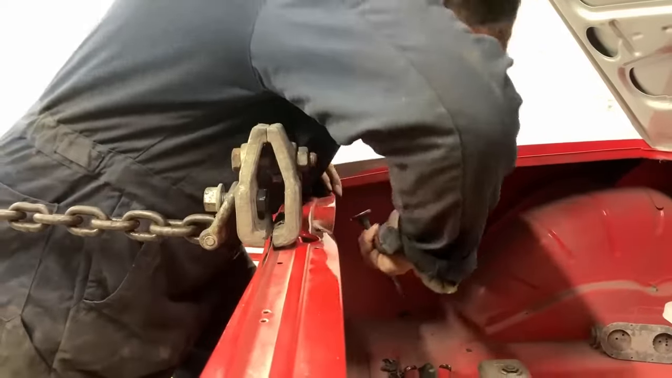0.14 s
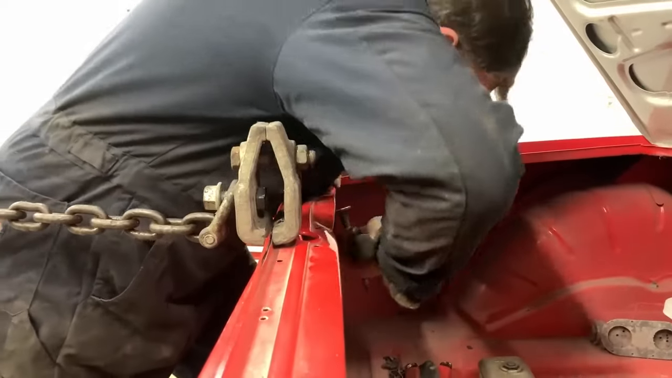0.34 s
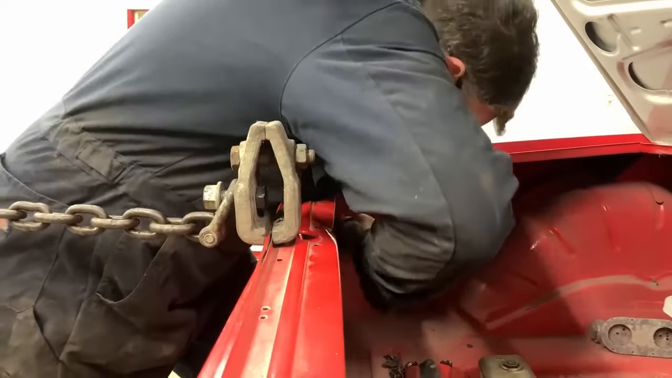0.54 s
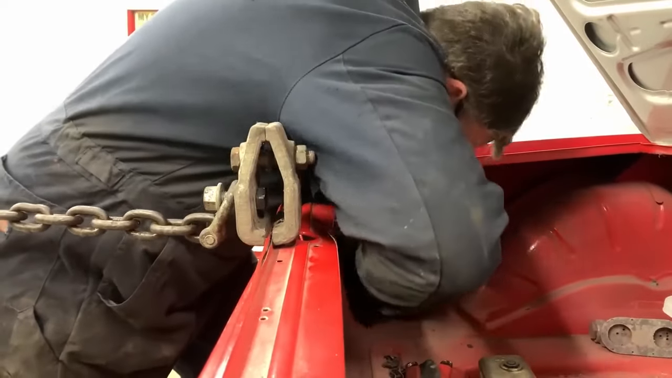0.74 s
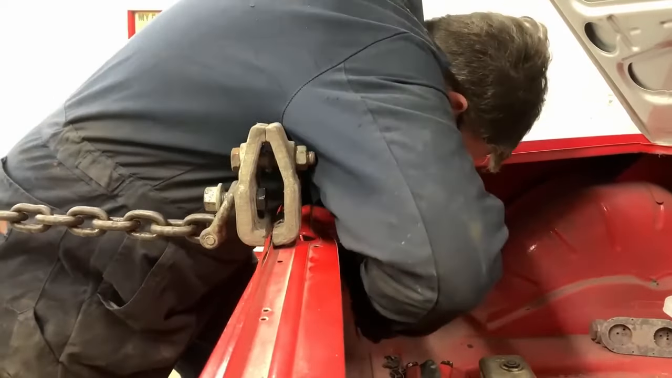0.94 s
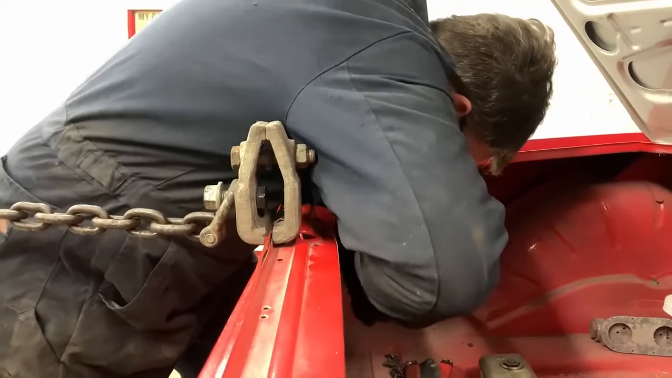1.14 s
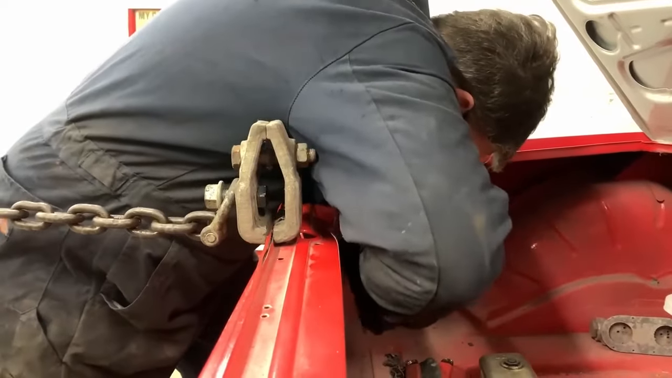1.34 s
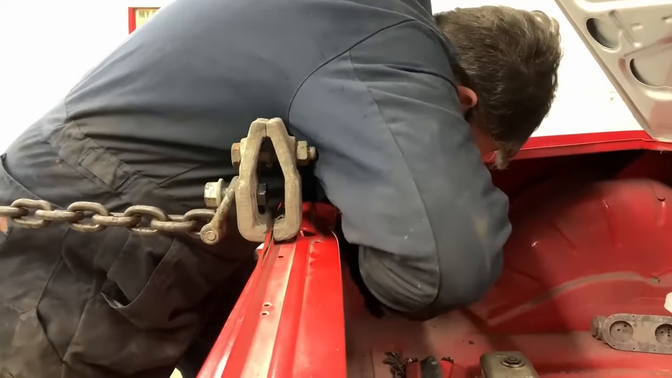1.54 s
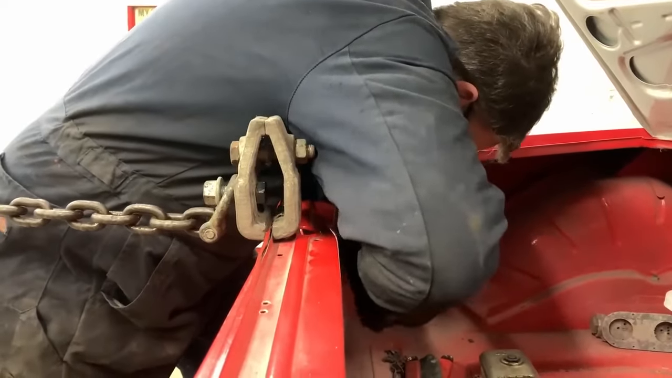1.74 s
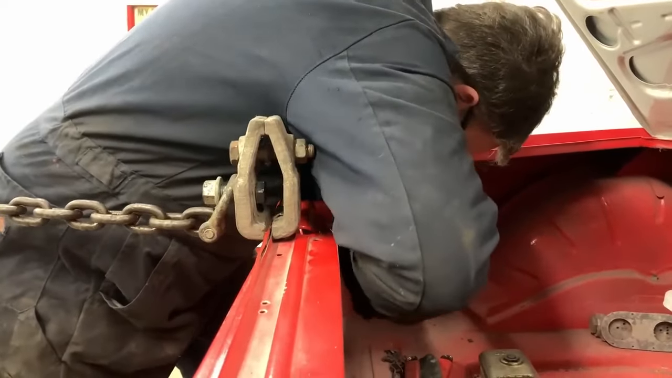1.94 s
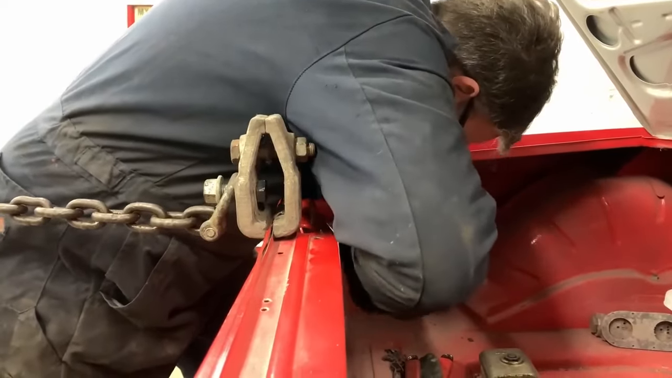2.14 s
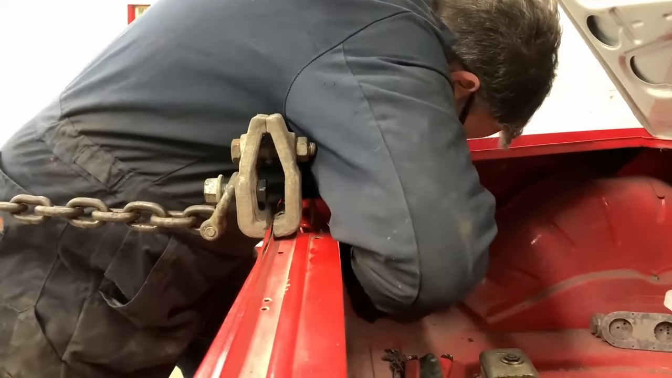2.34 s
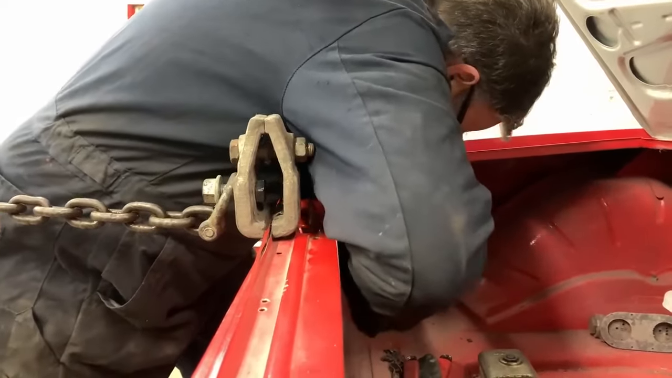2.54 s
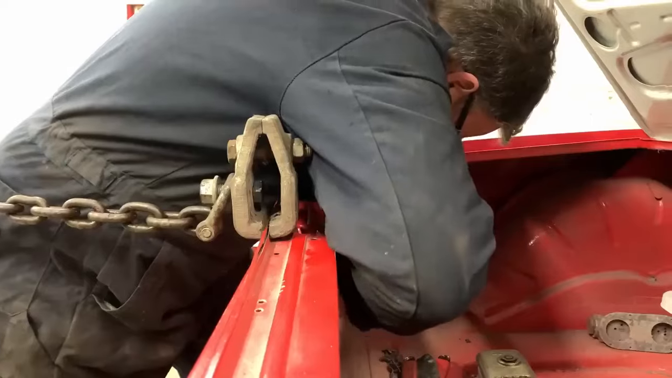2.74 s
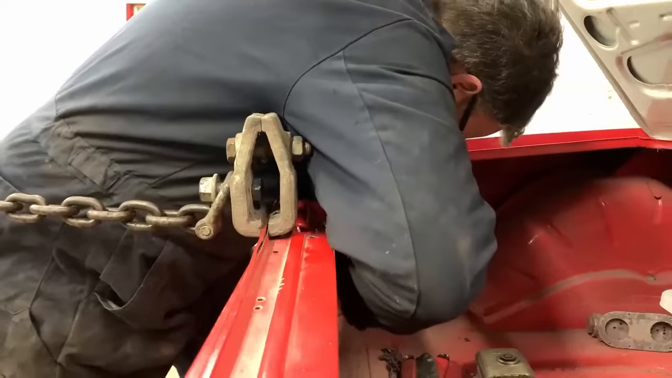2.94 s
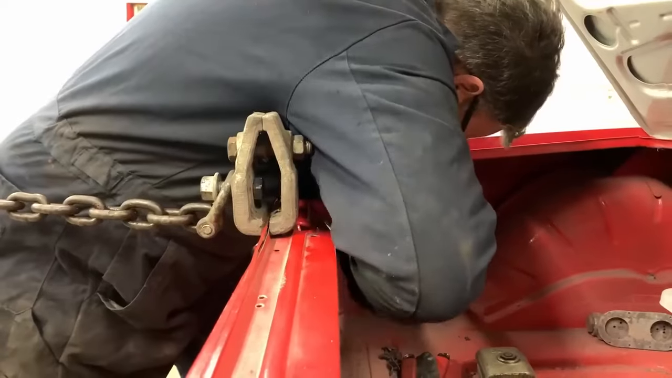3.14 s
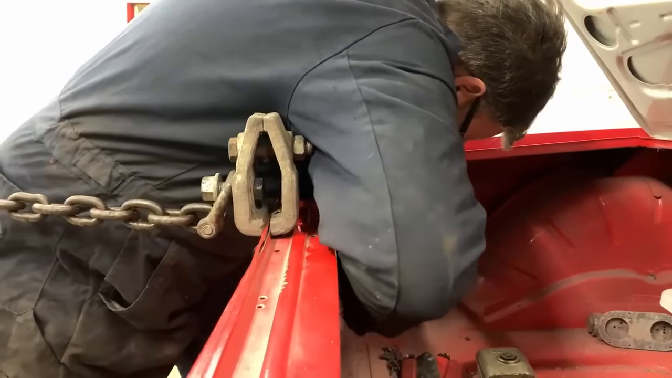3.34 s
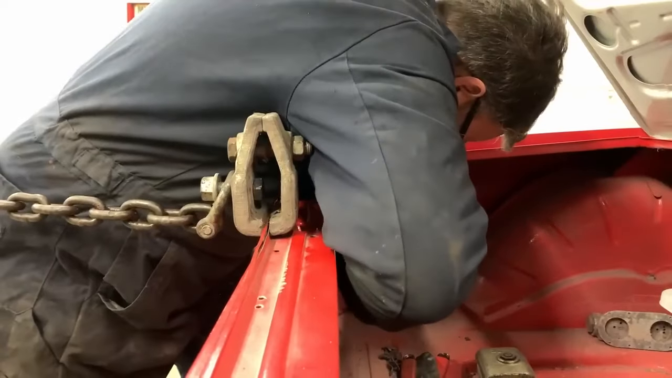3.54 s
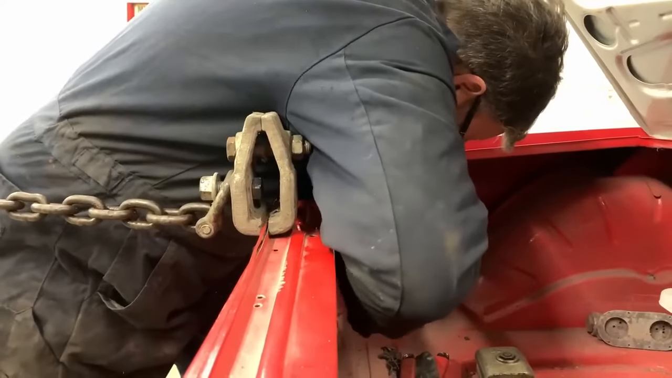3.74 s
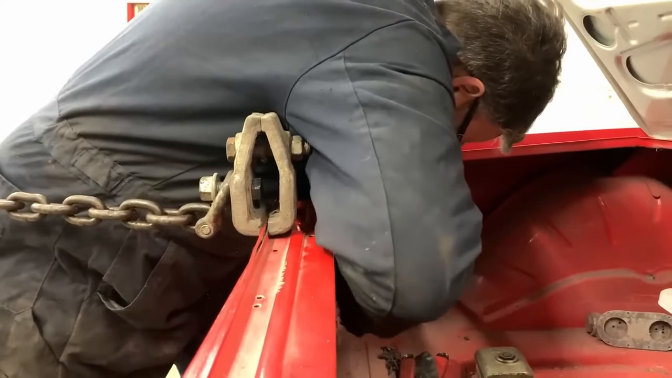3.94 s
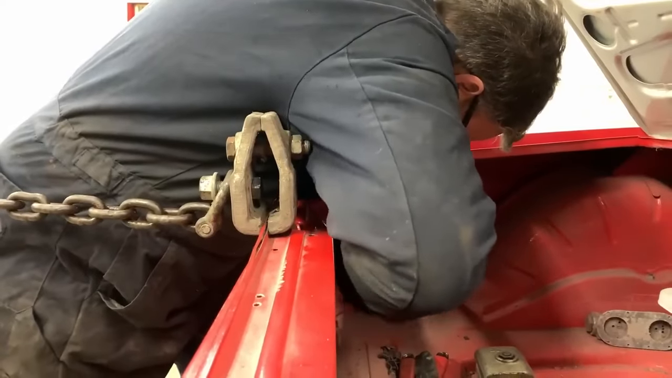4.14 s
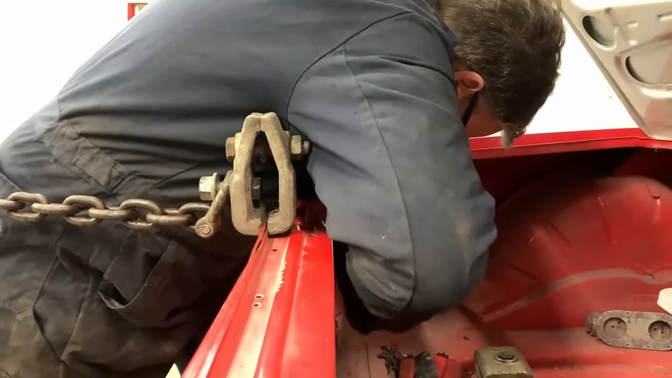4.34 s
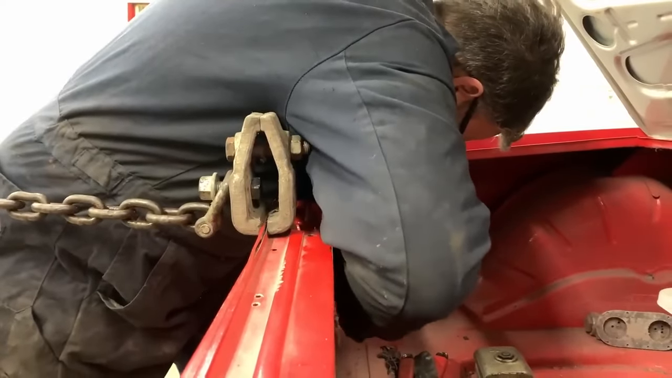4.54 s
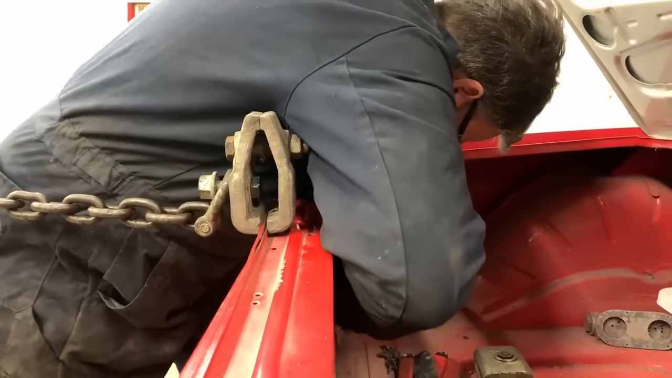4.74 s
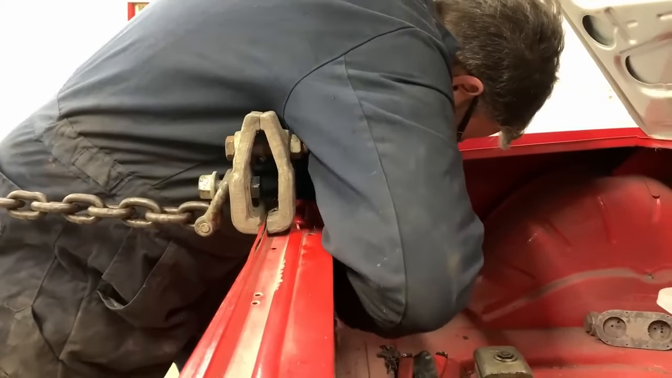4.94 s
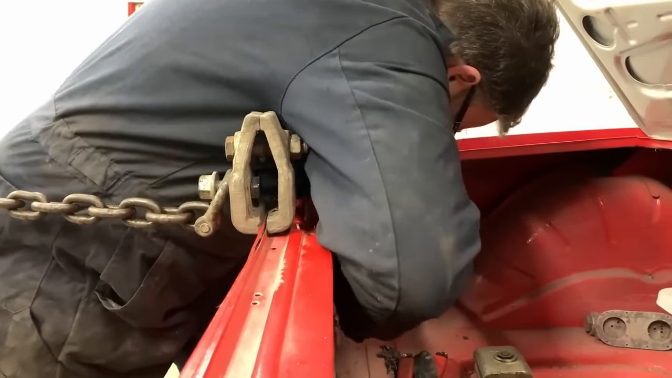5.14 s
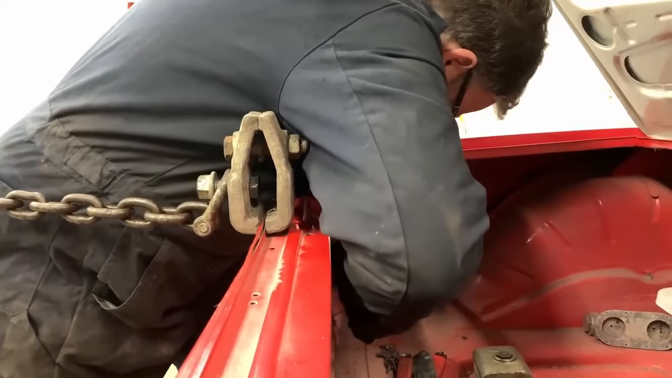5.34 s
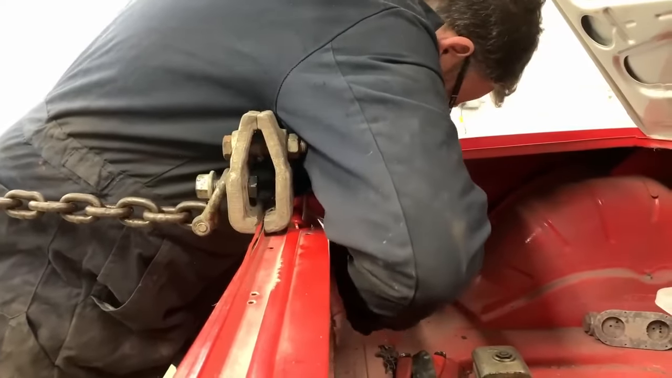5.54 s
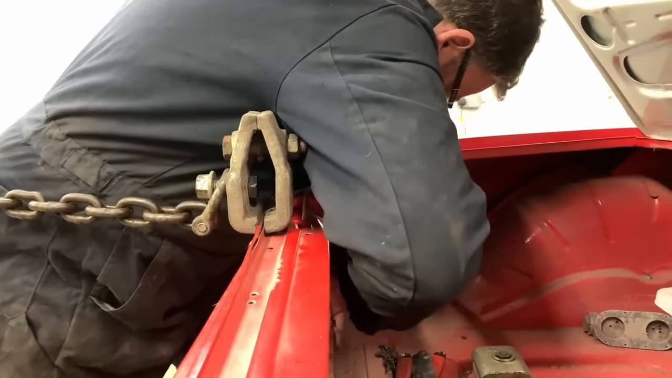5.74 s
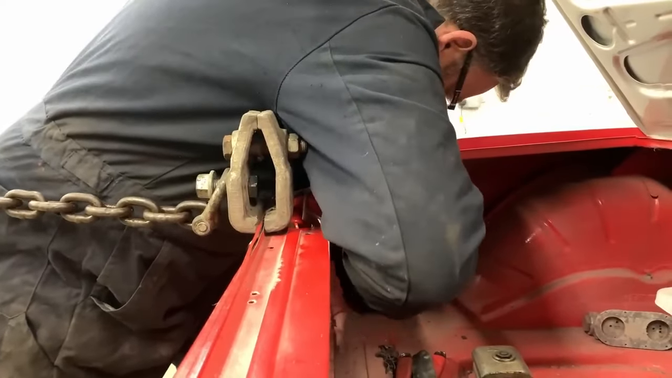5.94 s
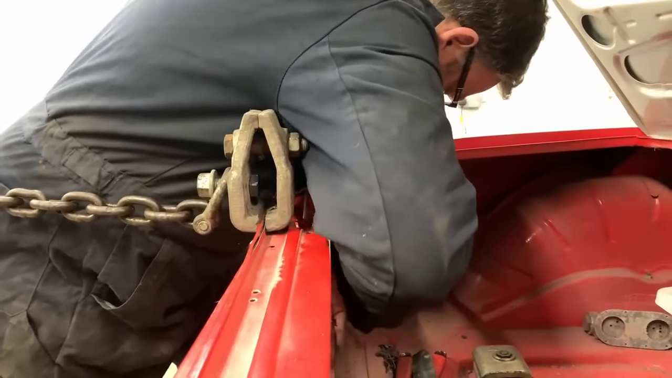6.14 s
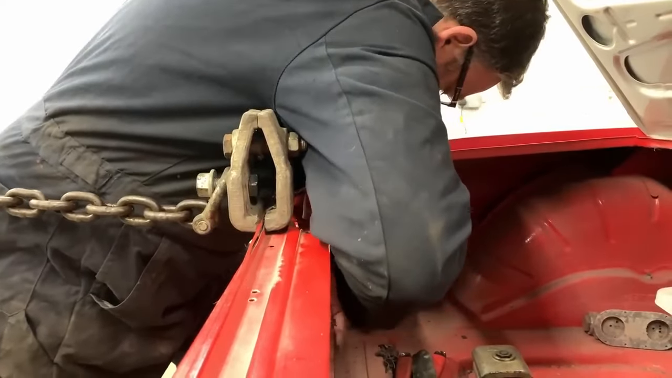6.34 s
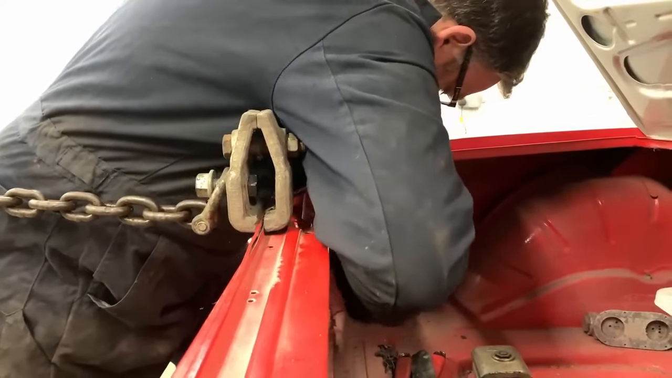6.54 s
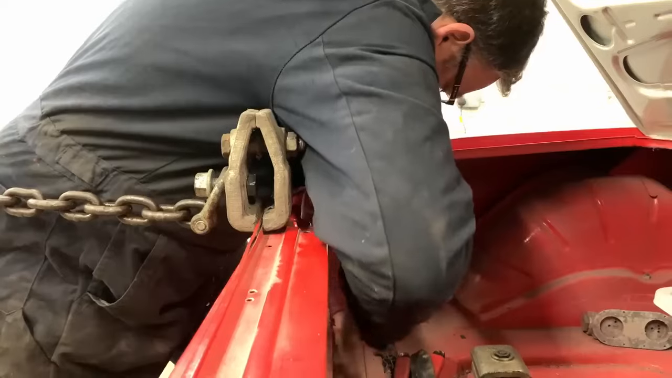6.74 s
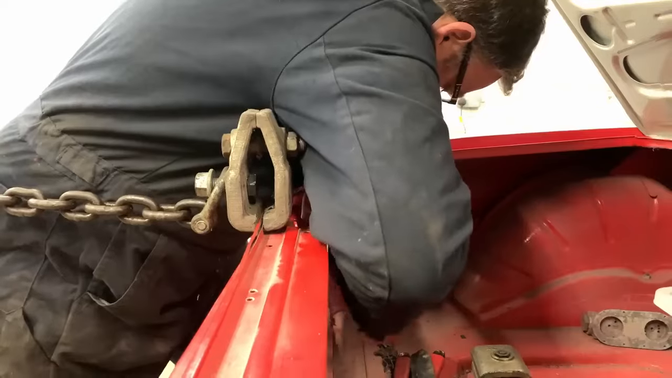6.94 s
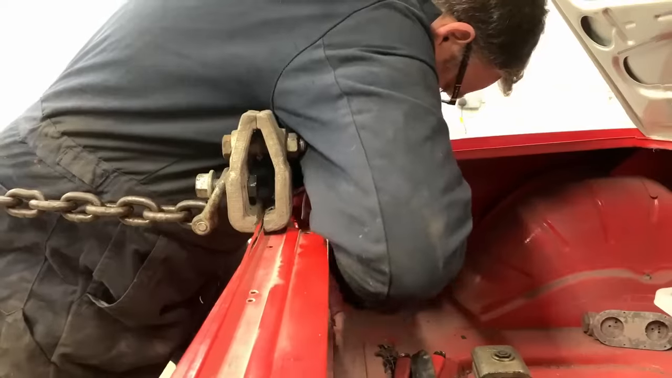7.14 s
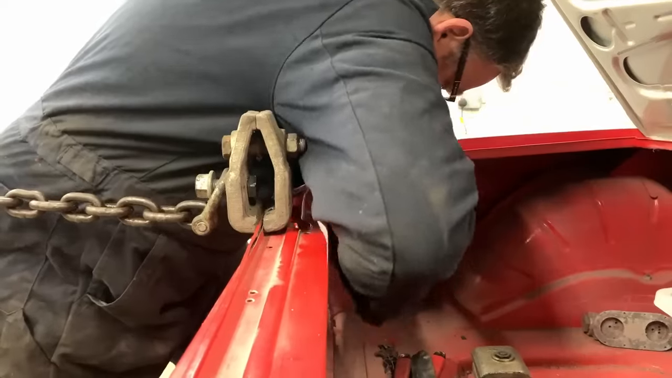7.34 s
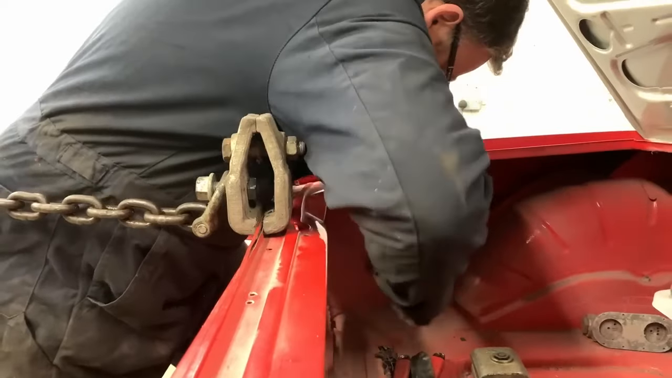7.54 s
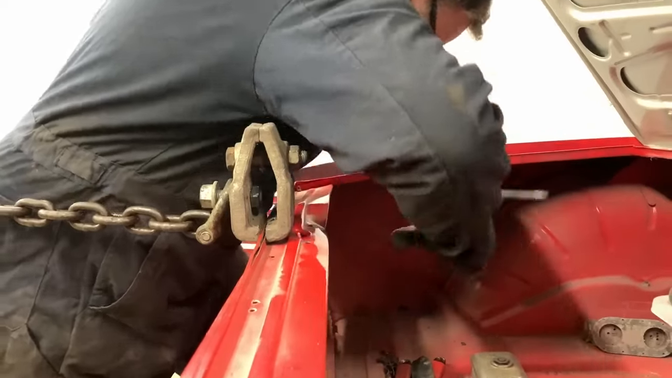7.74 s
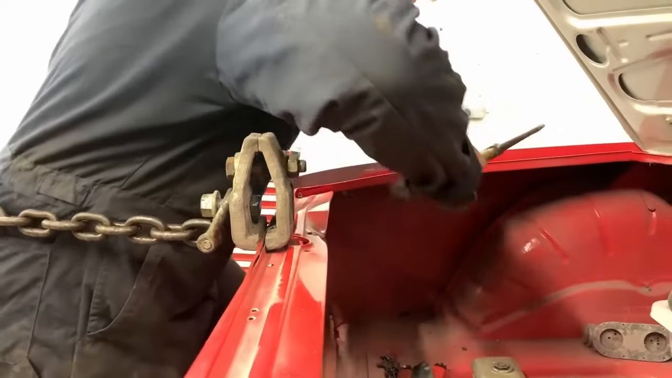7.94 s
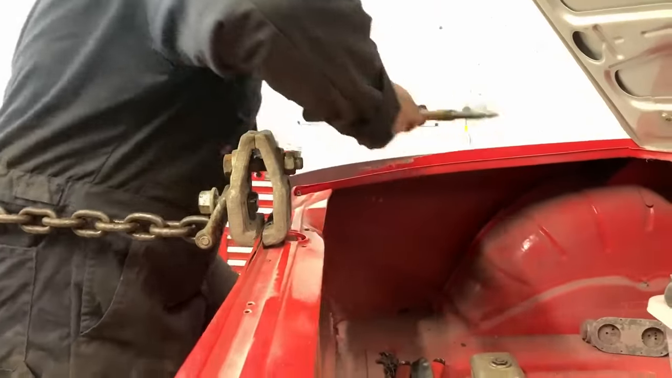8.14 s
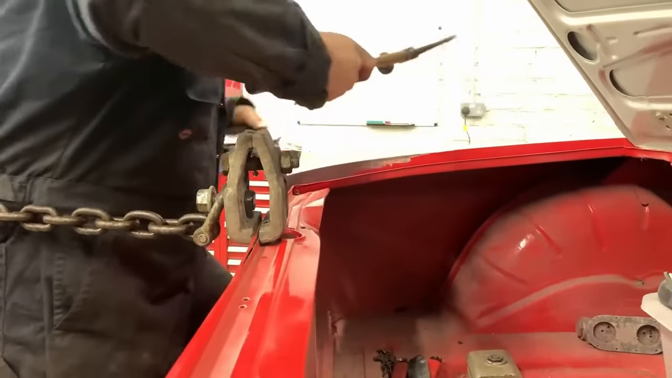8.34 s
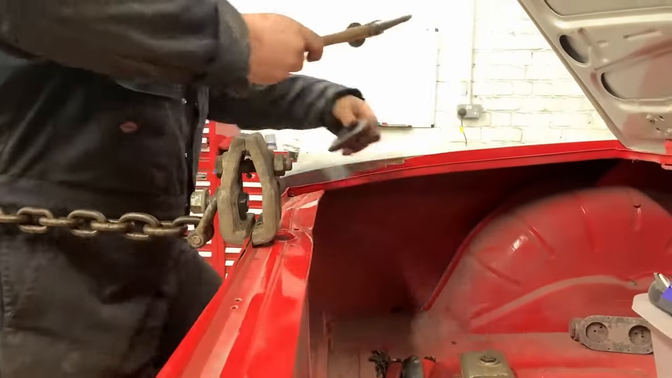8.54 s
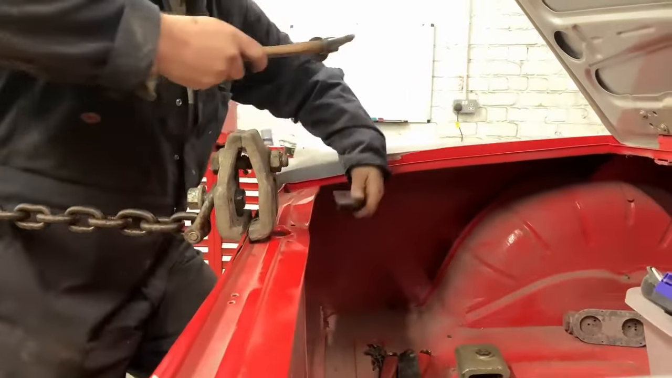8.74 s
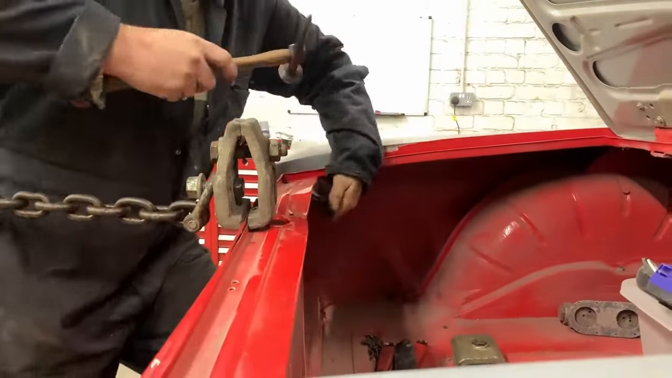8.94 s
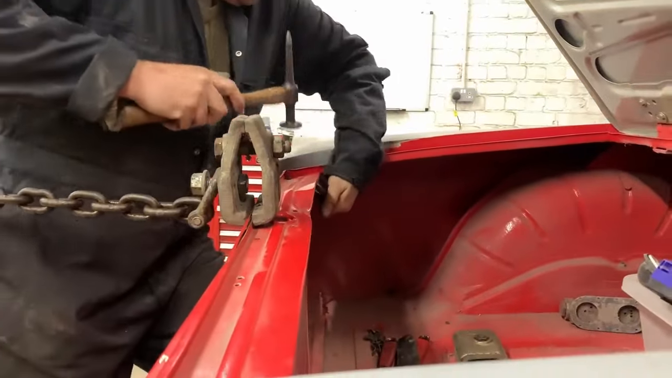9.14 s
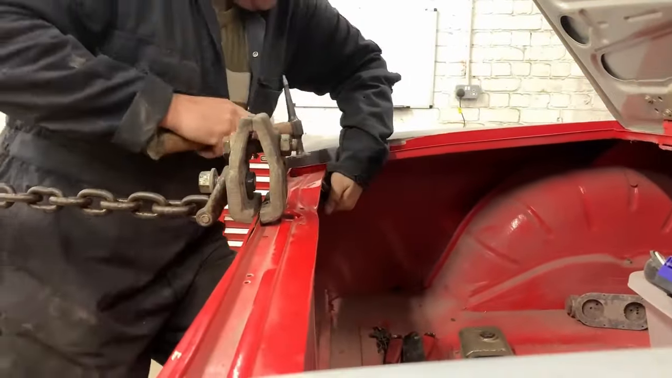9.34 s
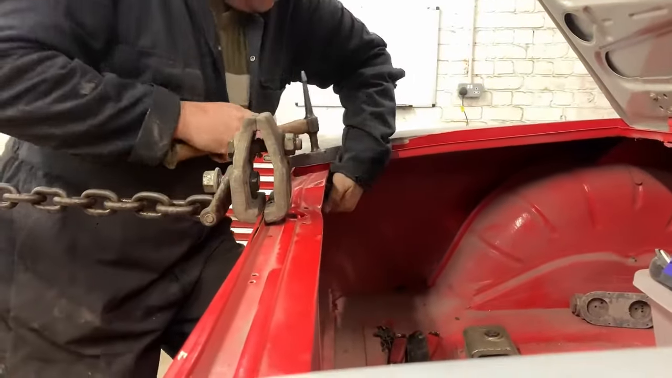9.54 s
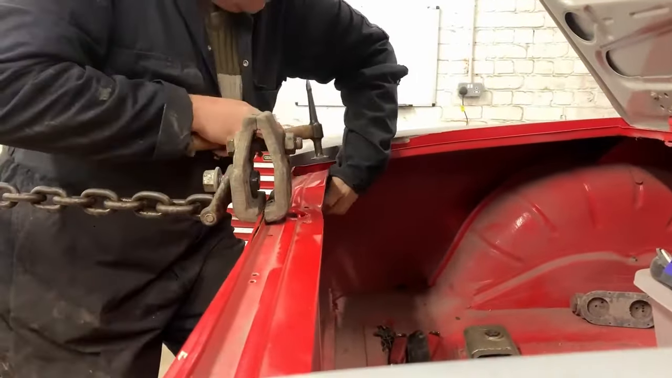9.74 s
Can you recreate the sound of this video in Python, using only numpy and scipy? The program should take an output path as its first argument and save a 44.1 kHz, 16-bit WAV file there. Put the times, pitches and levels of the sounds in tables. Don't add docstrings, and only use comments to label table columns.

```python
import sys
import numpy as np
from scipy import signal
from scipy.fft import rfft, irfft
from scipy.io import wavfile

SR = 44100
rng = np.random.default_rng(int(sys.argv[2]) if len(sys.argv) > 2 else 0)


def amp(db):
    return 10 ** (np.asarray(db, float) / 20)


def write(x):
    x = np.atleast_2d(x).T
    wavfile.write(sys.argv[1], SR, np.round(np.clip(x, -1, 1) * 32767).astype(np.int16))


N = 431298

# (time [s], peak [dB], hardness [dB/octave], delay of second landing [s], 0 = none)
BLOWS = [(0.65, -10.5, 1.16, 0), (1.106, 2.5, 0.3, 0.016), (1.503, 4.5, 0.36, .026),
         (1.877, 2.5, 1.5, 0.025), (2.216, 0.5, 2, 0.021), (2.866, -0.5, 1.8, .023), (3.213, 3, 2.1, .023),
         (3.564, 0.5, 2.83, .033), (3.883, -1.5, 4.4, 0.021), (4.175, -0.5, 3.9, 0.026),
         (4.466, -1.5, 3.9, 0.027), (4.746, 0.5, 3.2, .028), (5.032, 3.5, 1.64, .047), (5.71, -12, 2.7, 0),
         (6.034, -3, 2.6, 0.00093), (6.345, -4, 3.2, 0.00032), (6.635, -1.5, 3.1, 0.00027),
         (6.918, -2.5, 3.2, 0.00043), (7.203, -6, 4.9, 0.0018), (7.451, -8, 4.7, 0.00022)]
# (peak [dB], hardness [dB/octave], boom [dB], thud [dB], ring length [factor])
SECOND_LANDING = (10, 1.5, -7.5, 0.5, 0.42)
# (time [s], peak [dB], ring length [factor])
DOLLY_REBOUNDS = [
    (1.318, -28.5, 1.1),
    (1.6763, -19, 1.1),
    (2.0564, -21, 0.92),
    (2.4267, -21, 0.74),
    (2.9934, -25, 0.66),
    (3.029, -34, 0.66),
    (3.3058, -21, 0.48),
    (3.339, -14.5, 0.43),
    (3.365, -22.5, 0.6),
]
# (time [s], peak [dB], hardness [dB/octave], boom [dB], ring length [factor])
KNOCKS = [(.001, -47, -5, 15, .5), (0.144, -60, -2.9, 30, 1.05), (0.626, -55, -3.5, .1, .4),
          (5.349, -19, -2.9, -14, .5), (5.368, -38.5, -3, 18, .6), (5.463, -41, -2.5, -7, .55),
          (5.555, -60, -8, 3, .8), (5.652, -56, -5, -2.5, .8), (5.689, -42.5, -4, -5, .6),
          (9.003, -7, -3, 0.5, .82), (9.168, -15.5, -8.5, -9, .6)]
# (time [s], peak [dB], pitch [Hz])
TICKS = [(8.663, -33, 795), (8.663, -41, 2500), (8.668, -54, 4180), (8.693, -45, 5540),
         (8.709, -48.5, 5380), (8.716, -48, 5300), (8.734, -58, 6000), (8.756, -49, 5040),
         (8.79, -50, 5200), (8.798, -47, 6490), (8.826, -58, 2500), (8.874, -57, 5310), (9.3, -47, 2295),
         (9.685, -54, 8000), (9.715, -51.5, 5500), (9.722, -40, 5500)]
# (frequency [Hz], level [dB], T60 [s])
SHELL_MODES = [(86, -6.5, 0.29), (91, -3.5, 0.29), (158, -10, 0.62), (186.64, -3, 0.4), (197.6, -6, 0.62),
               (220.8, -3.5, 0.52), (247, -4, .42), (315.2, -5, 0.46), (362, -13.5, 0.1),
               (457.2, -8.5, 0.42), (503.3, -8.5, 0.36), (607, -6.5, 0.28), (630, -10, 0.32),
               (684, -5.5, 0.31), (780, -13.5, 0.039), (865.6, -7.5, .3), (1137, -23, 0.36),
               (1200.5, -12.5, 0.086), (1385, -15.5, 0.15), (1760, -21, 0.37), (2086, -20, 0.4),
               (2930, -16, 0.1), (2995, -19, 0.31), (3350, -17.5, 0.26), (3170, -24.5, 0.24),
               (5000, -29, 0.053)]
# (frequency [Hz], level [dB per Hz])
SHEET_SPECTRUM = [(15, -63), (25, -21.5), (125, -8.5), (220, 1), (389, -4.5), (617, -6), (1090, -13.5),
                  (1730, -19.5), (2600, -20), (5200, -26.5), (8000, -27.5), (15200, -42), (16500, -63)]
# (frequency [Hz], T60 [s])
SHEET_T60 = [(90, .42), (200, 0.6), (420, 0.42), (1100, 0.44), (2910, 0.41), (6500, 0.38), (10000, 0.34),
             (16000, 0.22)]
# (frequency [Hz], level [dB], T60 [s])
DOLLY_MODES = [(1720, -10, .06), (3000, -5, .05), (4533, -6, .05), (4856, -5, .04), (5500, -5, .05),
               (6440, -9, .05), (7305, -10, .05), (8160, -12, .04), (9959, -10, .045), (11460, -15, .04)]
# (frequency [Hz], level under the ring [dB])
SHOP_TAIL = [(110, -37), (200, -22), (400, -29), (2500, -33), (3400, -27), (4800, -32), (6800, -23),
             (15000, -36)]
# (frequency [Hz], T60 [s])
SHOP_T60 = [(60, 1.1), (400, .8), (2500, .5), (7000, .5), (15000, .3)]
# (frequency [Hz], level [dB per Hz])
FLOOR = [(25, -36), (50, -9), (124, -15), (210, -5), (330, -18), (3000, -23), (7000, -21), (16500, -33)]
# (time [s], level [dB])
HISS = [
    (0, -3.5),
    (7.95, -4.5),
    (8.1, -1.5),
    (9.78, -1.5),
]

EDGES_HZ = 25 * 2 ** np.arange(0, 9.6, 1 / 3)
CENTRES_HZ = np.sqrt(EDGES_HZ[1:] * EDGES_HZ[:-1])
STEP = 16
TRAVEL_S = .0008

BLOW_EXTRA_DB = 7
BOOM_DB, BOOM_PER_HARDNESS = -1, 2.21
NEW_SPOT_S = 5.5
THUD_HELD_DB, THUD_FREE_DB = -1.5, 7.5
RING, RING_PER_DB = 0.98, 0.0277
TOUCH_HARDNESS, TOUCH_BOOM_DB, TOUCH_THUD_DB = 3.2, -4.5, -5.5
KNOCK_THUD_DB = -3
SCUFF_START_S, SCUFF_SWELL_S, SCUFF_DB = 9.58, .2, -59
SCUFF_BAND_HZ = [650, 1500]
FLOOR_DB = -66.5
OVERLOAD, KNEE = 0.55, 5.9
SMOOTH, CUTOFF_HZ = 0.043, 16500


def contacts():
    blows, again = [], []
    for s, db, hard, delay_s in BLOWS:
        boom_db = BOOM_DB + BOOM_PER_HARDNESS * hard
        thud_db = THUD_FREE_DB if s > NEW_SPOT_S else THUD_HELD_DB
        blows.append((s, db + BLOW_EXTRA_DB, hard, boom_db, thud_db, RING + RING_PER_DB * db))
        if delay_s:
            again.append((s + delay_s, *SECOND_LANDING))
    touches = [(s, db, TOUCH_HARDNESS, TOUCH_BOOM_DB, TOUCH_THUD_DB, ring) for s, db, ring in DOLLY_REBOUNDS]
    knocks = [(s, db, hard, boom_db, KNOCK_THUD_DB, ring) for s, db, hard, boom_db, ring in KNOCKS]
    return blows + again + touches + knocks


def strength(hit, hz):
    s, db, hardness, boom_db, thud_db, ring = hit
    tilt_db = hardness * np.log2(0.43 + hz / 1500)
    return db + tilt_db + boom_db / (1 + (hz / 380) ** 4) + thud_db / (1 + (hz / 125) ** 6)


def at_hz(points, hz):
    table_hz, values = np.array(points)[:, 0], np.array(points)[:, 1]
    return np.interp(np.log(hz), np.log(table_hz), values)


def bandpass(x, low_hz, high_hz):
    return signal.sosfilt(signal.butter(2, [low_hz, high_hz], "band", fs=SR, output="sos"), x)


def band_noises(ripple_db):
    white = rfft(rng.standard_normal((2, N)))
    hz = np.arange(white.shape[1]) * SR / N
    ripple = np.interp(hz, np.arange(600) * 40, rng.standard_normal(600))
    white = irfft(white * amp(ripple_db * ripple), N)
    return np.array([bandpass(white[k % 2], low, high)
                     for k, (low, high) in enumerate(zip(EDGES_HZ, EDGES_HZ[1:]))])


def sheet_energy(hits, crack_db=9.5, crack_s=0.0067, late_db=-11.0, rise_cycles=5.3, spot_db=2.1, low_hz=300):
    t = np.arange(2400) * STEP / SR
    energy = np.zeros((len(CENTRES_HZ), N // STEP + 3002))
    hz = CENTRES_HZ[:, None]
    sparse = 1 / (1 + (low_hz / hz) ** 2)
    late = amp(2 * late_db / (1 + (3500 / hz) ** 2))
    spots = rng.standard_normal((len(hits), 2, len(CENTRES_HZ), 1))
    for hit, (drive, damping) in zip(hits, spots):
        s, _, hardness, _, _, ring = hit
        soft = np.clip(-hardness / 3 - 1, 0, 1)
        level = amp(strength(hit, hz) + at_hz(SHEET_SPECTRUM, hz) + spot_db * drive)
        decay = amp(-120 * t / (ring * at_hz(SHEET_T60, hz) * np.exp(.05 * damping)))
        crack = amp(2 * crack_db) * np.exp(-t / crack_s) * (hz > 1200) * (1 - soft)
        shop = amp(2 * at_hz(SHOP_TAIL, hz) - 120 * t / (ring * at_hz(SHOP_T60, hz)))
        contact_s = 0.0041 * soft
        rise = 1 - np.exp(-(t + 1e-4) / (rise_cycles / hz + contact_s))
        i = round((s + TRAVEL_S) * SR / STEP)
        energy[:, i:i + len(t)] += level ** 2 * sparse * rise * (crack + late * (decay + shop))
    return energy


def sheet(hits, bands, gain_db=12.0):
    envelopes = np.sqrt(sheet_energy(hits))
    steps = np.arange(N) / STEP
    return amp(gain_db) * sum(band * np.interp(steps, np.arange(len(envelope)), envelope)
                              for band, envelope in zip(bands, envelopes))


def shell(hits, gain_db=-9.5, spread_db=2.0, detune=.022, rise_cycles=2.5):
    out = np.zeros(N + SR)
    t = np.arange(SR * 3 // 5, dtype=np.float32) / SR
    hz, db, t60_s = np.float32(np.transpose(SHELL_MODES)[:, :, None])
    chances = rng.standard_normal((len(hits), 3, len(SHELL_MODES), 1), dtype=np.float32)
    for hit, (shift, drive, phase) in zip(hits, chances):
        s, ring = hit[0], hit[-1]
        pitch_hz = hz * (1 + detune * shift)
        level = amp(gain_db + strength(hit, hz) + db + spread_db * drive - 60 * t / (ring * t60_s))
        rise = 1 - np.exp(-t * hz / rise_cycles)
        i = round((s + TRAVEL_S) * SR)
        out[i:i + len(t)] += np.sum(level * rise * np.sin(2 * np.pi * pitch_hz * t + 9 * phase), axis=0)
    return out[:N]


def dolly(gain_db=-9., spread_db=4.):
    out, t = np.zeros(N), np.arange(SR // 5) / SR
    hz, db, t60_s = np.transpose(DOLLY_MODES)[:, :, None]
    chances = rng.standard_normal((len(DOLLY_REBOUNDS), len(DOLLY_MODES), 1))
    for (s, peak_db, _), chance in zip(DOLLY_REBOUNDS, chances):
        level = amp(gain_db + min(peak_db, -8) + db + spread_db * chance - 60 * t / t60_s)
        i = round((s + TRAVEL_S) * SR)
        out[i:i + len(t)] += np.sum(level * np.sin(2 * np.pi * hz * t), axis=0)
    return out


def ticks(gain_db=3.0, t60_s=0.009, width=1.35):
    out, t = np.zeros(N), np.arange(1500) / SR
    for (s, db, hz), noise in zip(TICKS, rng.standard_normal((len(TICKS), len(t)))):
        burst = amp(db + gain_db - 60 * t / t60_s) * noise
        i = round(s * SR)
        out[i:i + len(t)] += bandpass(burst, hz / width, min(hz * width, 16000))[:N - i]
    return out


def scuff(swell_db=19.0, grain_db=2.5):
    push = (np.arange(N) / SR - SCUFF_START_S) / SCUFF_SWELL_S
    noise = rng.standard_normal(N)
    unevenness = np.repeat(rng.standard_normal(N // 200 + 1), 200)[:N]
    rub = bandpass(noise * amp(grain_db * unevenness), *SCUFF_BAND_HZ)
    swell = amp(SCUFF_DB - swell_db * np.clip(1 - push, 0, 1))
    return rub / rub.std() * swell * (push > 0)


def shop_air(bands):
    gains, low = amp(at_hz(FLOOR, CENTRES_HZ)), CENTRES_HZ < 400
    hum = gains[low] @ bands[low]
    hiss = gains[~low] @ bands[~low]
    hiss_gain = amp(np.interp(np.arange(N) / SR, *np.transpose(HISS)))
    return amp(FLOOR_DB) * (hum + hiss_gain * hiss) / (hum + hiss).std()


def scene():
    hits = contacts()
    bands = band_noises(ripple_db=2.5)
    panel = sheet(hits, bands) + shell(hits)
    tools = dolly() + ticks() + scuff()
    air = shop_air(bands[:, ::-1])
    return (panel + tools + air)[None]


def roll_off(x):
    return signal.sosfilt(signal.butter(12, 16960, fs=SR, output="sos"), x)


def record(dry):
    squared = dry / (1 + np.abs(dry / OVERLOAD) ** KNEE) ** (1 / KNEE)
    dulled = signal.lfilter([1 - SMOOTH, SMOOTH], [1], squared)
    cut = signal.sosfiltfilt(signal.cheby2(12, 45, CUTOFF_HZ, fs=SR, output="sos"), dulled)
    return roll_off(cut)


dry = scene()
out = record(dry)
write(out)
```